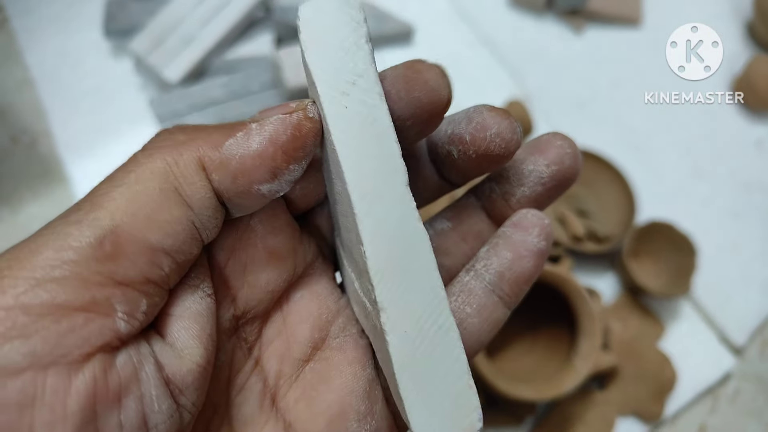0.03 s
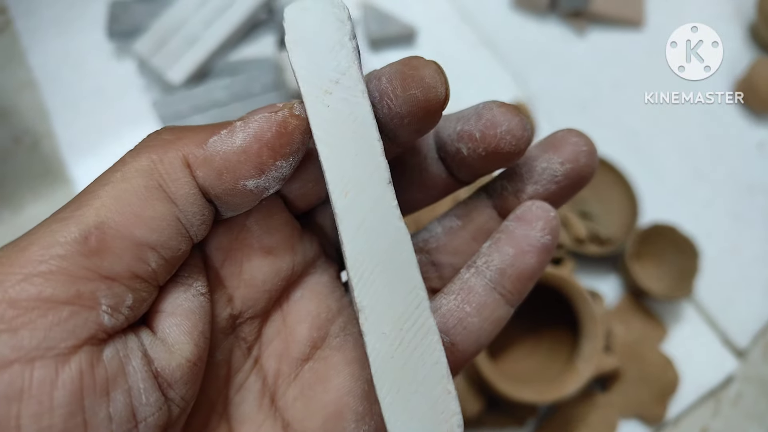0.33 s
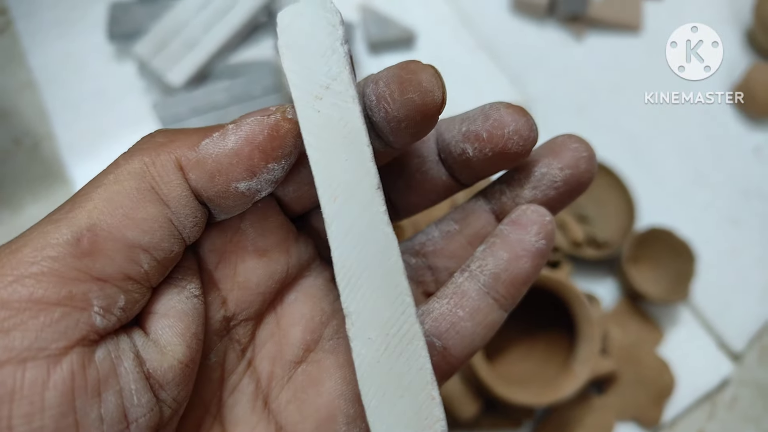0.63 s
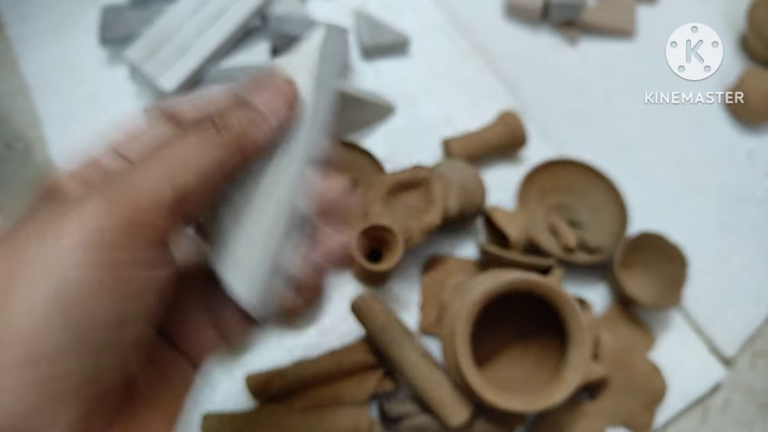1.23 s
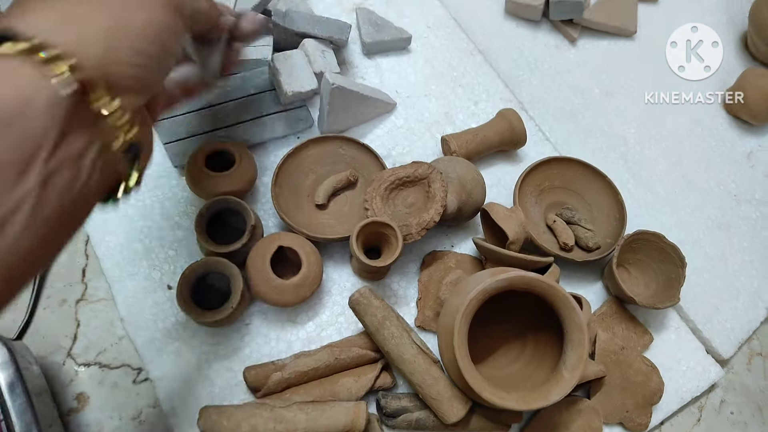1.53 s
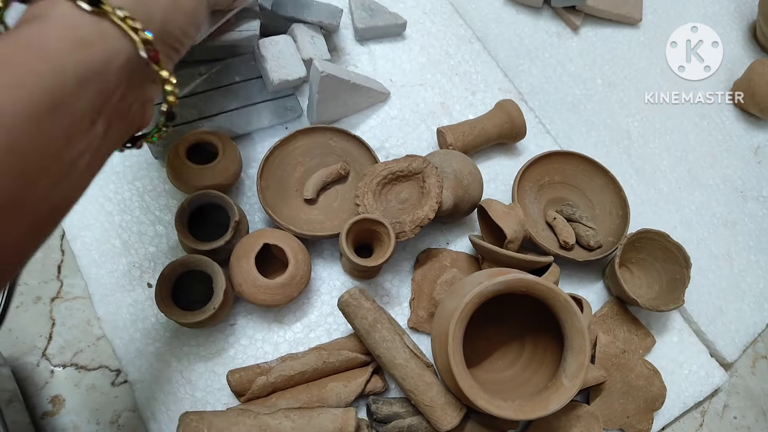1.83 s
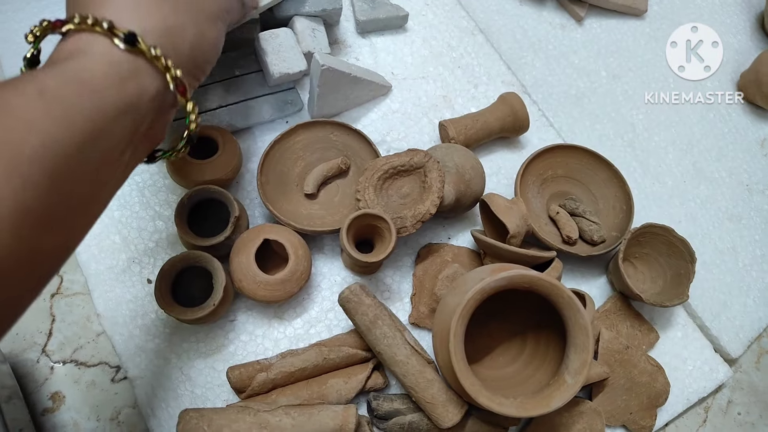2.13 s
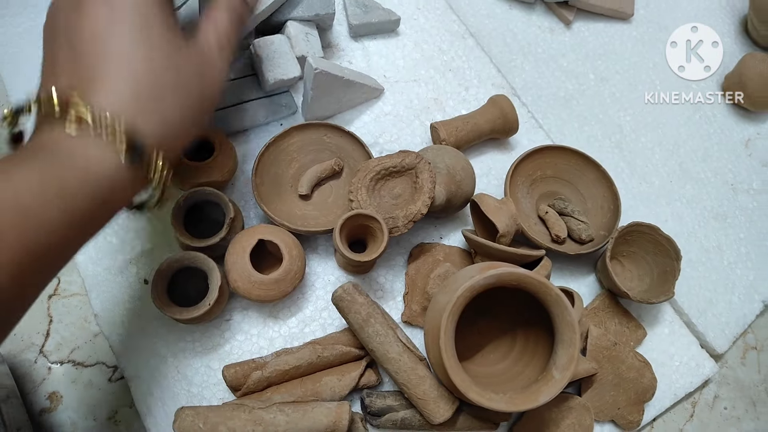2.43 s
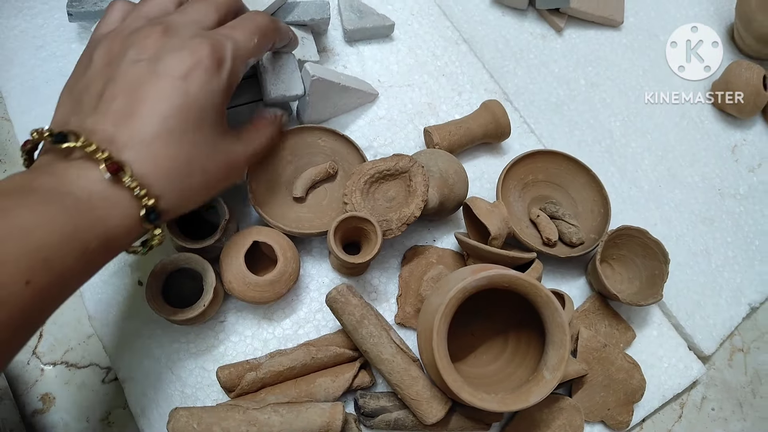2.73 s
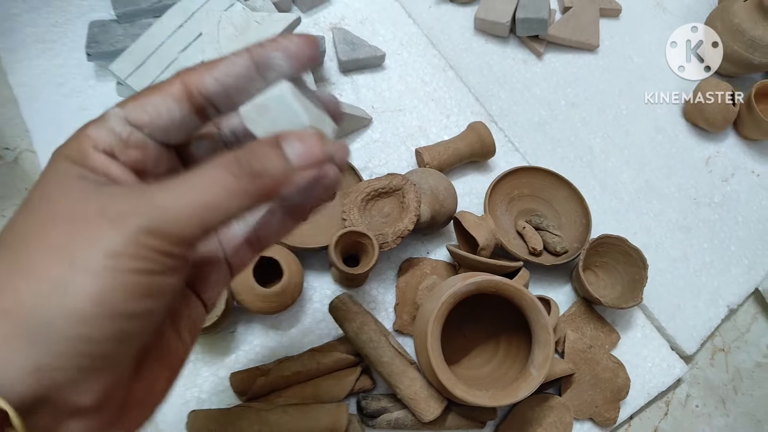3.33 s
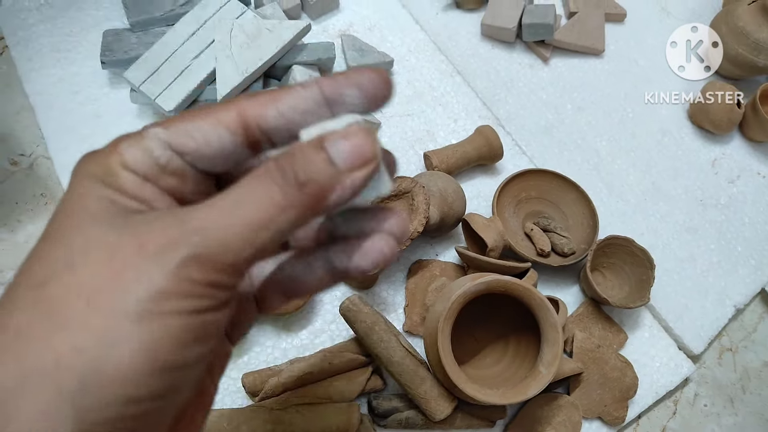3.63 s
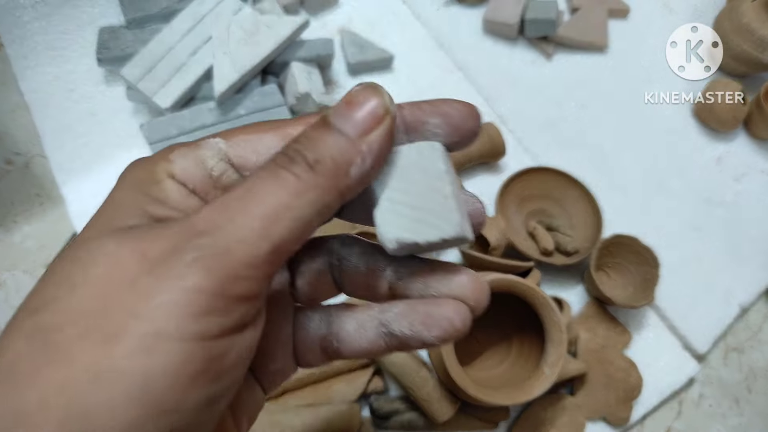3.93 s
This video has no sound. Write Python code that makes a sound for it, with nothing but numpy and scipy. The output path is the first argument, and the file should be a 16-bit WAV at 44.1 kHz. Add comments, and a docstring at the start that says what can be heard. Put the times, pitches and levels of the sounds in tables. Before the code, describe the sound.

A few small clacks of dry clay on clay, with a fan humming behind.

```python
"""Dry clay bars on a heap

In a quiet room, a hand lays a dry clay bar on a heap of others and picks out a small block.
Each contact is a dead knock of the heap, a gritty crack and sometimes the ring of one bar.
Chalky fingers rub softly and crumbs tick. A motor, probably a fan, hums behind it all in a rush of air."""
import sys
import numpy as np
from scipy import signal
from scipy.fft import rfft, irfft
from scipy.io import wavfile

SR = 44100
rng = np.random.default_rng(int(sys.argv[2]) if len(sys.argv) > 2 else 0)


def store_wav(level_fs):
    """Save 16-bit WAV to argv[1]."""
    pcm = np.round(np.clip(np.atleast_2d(level_fs), -1, 1) * 32767)
    wavfile.write(sys.argv[1], SR, pcm.T.astype(np.int16))


N = 176400
T = np.arange(N) / SR
FREQ = np.fft.rfftfreq(N, 1 / SR) + 1e-3


def amp(db):
    """Decibels to gain."""
    return 10 ** (np.asarray(db) / 20)


def unit(x):
    """Scale to rms 1."""
    return x / np.sqrt(np.mean(x ** 2))


def curve(points):
    """Join (Hz, value) points on a log-frequency axis."""
    hz, value = np.array(points, float).T
    return np.interp(np.log(FREQ), np.log(hz), value)


def noise(colour):
    """Noise of rms 1, shaped by a gain per frequency."""
    return unit(irfft(rfft(rng.standard_normal(N)) * colour, N))


def decay(t60):
    """Exponential envelope, 60 dB down after t60 seconds."""
    return np.exp(-np.minimum(np.log(1000) * T / t60, 60))


def bell(hz, octaves):
    """Bell-shaped EQ around a centre."""
    return np.exp(-.5 * (np.log2(FREQ / hz) / octaves) ** 2)


def drift(rate_hz):
    """Smooth random modulation of rms 1."""
    return noise(np.exp(-np.minimum((FREQ / rate_hz) ** 2, 20)))


def pan(db):
    """Left and right gains; positive dB leans left."""
    return amp(np.array([[1], [-1]]) * db / 2)


def butter(x, hz, kind, order):
    """Low-pass or high-pass filter."""
    return signal.sosfilt(signal.butter(order, hz, kind, fs=SR, output="sos"), x)


def add(out, start, sound):
    """Mix a sound in at a start in seconds."""
    i = int(start * SR)
    out[i:i + len(sound)] += sound[:N - i]


# The motor's tones. Each row: pitch in Hz, level in dB.
MOTOR_TONES = [(39.5, -58), (57.2, -49), (82.3, -41), (137.1, -51), (172, -51.5), (184, -49.5), (229, -55)]


def motor_hum(waver_db=0.64, wander_rad=0.25):
    """Low motor tones waver in level and phase; the higher ones wander further in phase."""
    tones = np.zeros(N)
    for hz, db in MOTOR_TONES:
        peak = np.sqrt(2) * amp(db + waver_db * drift(4.2))
        phase = 2 * np.pi * (hz * T + rng.random())
        wander = wander_rad * (hz / MOTOR_TONES[1][0]) ** 2 * drift(3.8)
        tones += peak * np.sin(phase + wander)
    return tones


# The colour of the air bed. Each row: frequency in Hz, relative level in dB.
AIR_EQ = [(20, -20.5), (40, -3.5), (80, 0), (120, 2), (185, -3), (260, -6.5), (330, -7.5), (450, -9.5),
          (600, -17.5), (660, -12), (730, -14), (850, -17.5), (1100, -18), (1700, -26), (2600, -28),
          (3600, -33.5), (5000, -43.5), (8000, -49.5), (12000, -54.5), (15500, -49)]


def air_rush(level_db=-41.5, mic_gap_m=0.14, sound_m_s=343):
    """Steady air from all sides: two mics hear long waves alike and short ones differently."""
    likeness = 0.85 * np.sinc(2 * FREQ * mic_gap_m / sound_m_s)
    mid, side = rfft(rng.standard_normal((2, N))) * np.sqrt([1 + likeness, 1 - likeness])
    spectra = np.array([mid + side, mid - side]) * amp(curve(AIR_EQ))
    return amp(level_db) * unit(irfft(spectra, N))


# Finger strokes. Each row: peak time in seconds, fade on each side in seconds, level in dB, centre in Hz.
FINGER_STROKES = [(0.044, 0.21, -69, 9900), (.9, 0.33, -73, 5130), (0.962, 0.14, -71.5, 8600),
                  (1.082, 0.033, -66, 3020), (1.296, 0.22, -72, 11000), (1.345, 0.045, -65.5, 8450),
                  (1.49, 0.057, -67, 8500), (1.713, 0.43, -75.5, 10300), (2.18, 0.039, -67, 7500),
                  (2.233, 0.023, -69, 8000), (2.434, 0.035, -67.5, 12000), (2.557, 0.13, -72.5, 9750),
                  (2.729, 0.12, -62, 1900), (2.733, 0.099, -69.5, 8950), (2.864, 0.07, -70, 9000),
                  (3.06, 0.15, -76.5, 7950), (3.315, 0.087, -78, 10900), (3.753, 0.027, -70, 8000),
                  (3.895, 0.11, -71, 10900)]


def finger_rubs(grain_db=3):
    """Dusty skin slides over clay in soft, grainy swells."""
    out = np.zeros(N)
    for peak_s, fade_s, db, hz in FINGER_STROKES:
        swell = np.cos(np.pi / 2 * np.clip((T - peak_s) / fade_s, -1, 1)) ** 2
        out += amp(db) * swell * noise(bell(hz, octaves=0.85))
    grain = unit(amp(grain_db * drift(250)))
    return out * grain


def ring(modes, size, scatter=0.006):
    """Modes die away after a blow; where it lands shifts their level and pitch a little."""
    out = np.zeros(size)
    for hz, db, t60 in modes:
        nudge_db, detune = rng.standard_normal(2)
        tone = np.sin(2 * np.pi * hz * (1 + scatter * detune) * T[:size])
        out += amp(db + nudge_db) * decay(t60)[:size] * tone
    return out


# Modes of the heap and of one free bar. Each row: pitch in Hz, level in dB, 60 dB decay in seconds.
HEAP_MODES = [(675, -2.5, 0.039), (769, -5.5, 0.03), (846, -7, 0.035), (1020, -8.5, 0.035),
              (1390, -12, 0.015), (1710, -11, 0.015), (2420, -12.5, 0.0072), (2645, -5, 0.011),
              (3200, -6, 0.0094), (3430, -16.5, 0.046), (4120, -25, 0.04), (5140, -24, 0.013),
              (6250, -21, 0.013), (7700, -21, .016)]
BAR_MODES = [(3860, -2, 0.013), (7470, -5, 0.012)]
# The colour of crushed grit. Each row: frequency in Hz, relative level in dB.
GRIT_EQ = [(300, -4), (900, 7.5), (3000, -7), (5500, -3), (11000, -9.5), (16000, -13)]
# Clay hitting clay. Each row: start in seconds, relative level in dB, hardness as a low-pass in Hz,
# grit trim in dB, bar ring trim in dB.
CONTACTS = [(2.1342, -27, 5900, 9, -20), (2.1400, -32, 7500, 14, -23), (2.1586, -9, 4430, 1, -16),
            (2.1603, -35, 15500, 16, -20), (2.1760, -26.5, 12000, 10, -20), (2.1812, -28, 13000, 5, -18),
            (2.1895, -17, 1600, -15, -25), (2.2166, -38, 15500, 32, 4), (2.2262, -44, 14000, 16, -20),
            (2.3888, -0.5, 2520, 9, -23), (2.3905, -18, 7500, 16.5, -5), (2.3936, -15, 8100, 14.5, -15),
            (2.4027, 1, 3800, -24, -10), (2.5078, -6.5, 2050, -6, 11), (2.5228, -31, 3000, -18, 9)]


def clay_clacks(level_db=-25.5, grit_db=-2, grit_t60_s=0.0058, low_cut_hz=676):
    """Each contact knocks the heap, crushes grit and rings the bar; soft contacts are duller."""
    out, size = np.zeros(N), 8000  # samples per hit
    grit = noise(amp(curve(GRIT_EQ)))
    for k, (start, db, hardness_hz, grit_trim, bar_trim) in enumerate(CONTACTS):
        knock = ring(HEAP_MODES, size)
        crack = amp(grit_db + grit_trim) * grit[k * size:(k + 1) * size] * decay(grit_t60_s)[:size]
        bar = amp(bar_trim) * ring(BAR_MODES, size)
        hit = butter(knock + crack + bar, hardness_hz, "low", order=2)
        add(out, start, amp(level_db + db) * hit)
    return butter(out, low_cut_hz, "high", order=5)  # small pieces radiate little bass


# Light ticks. Each row: start in seconds, relative level in dB, centre in Hz.
CRUMB_TICKS = [(2.6573, -20.5, 7100), (3.0348, -24, 6250), (3.2, -21.5, 13000), (3.386, -27, 11100),
               (3.745, -26.5, 6460)]


def crumb_ticks(level_db=-29, t60_s=0.0054):
    """Crumbs and edges give tiny bright snaps as the block is picked out and turned."""
    out = np.zeros(N)
    for start, db, hz in CRUMB_TICKS:
        add(out, start, amp(level_db + db) * noise(bell(hz, octaves=0.62)) * decay(t60_s))
    return out


# The stereo lean of the direct sound. Each row: frequency in Hz, left minus right in dB.
DIRECT_PAN = [(300, 9), (900, -7), (1600, 7), (2400, 6), (3700, 9), (5500, 4), (8000, 3), (15000, 3)]
# The colour of the reverb. Each row: frequency in Hz, relative level in dB.
REVERB_EQ = [(200, -16), (700, -5), (1200, -0.5), (2500, -2.5), (3900, 2), (5500, -1.5), (8000, -2),
             (16000, -6.5)]


def room(x, wet_db, right_lag_s=0.0003045, near_db=-4, walls_db=-6.5):
    """Sound arrives from the left; pots and floor scatter it at once, the walls a little later."""
    lag = np.exp(-2j * np.pi * FREQ * np.array([[0], [right_lag_s]]))
    direct = irfft(rfft(x) * lag * pan(curve(DIRECT_PAN)), N)
    colour, wet = amp(curve(REVERB_EQ)), []
    for _ in range(2):
        near = noise(colour) * decay(t60=0.012) * (T > 0.001)
        walls = noise(colour) * decay(t60=0.28) * (T > 0.0019)
        echoes = (amp(near_db) * unit(near) + amp(walls_db) * unit(walls)) / np.sqrt(N)
        wet.append(signal.fftconvolve(x, echoes)[:N])
    return direct + amp(wet_db) * np.array(wet)


def scene():
    """Close clay and fingers in the room, over a bed of hum and air."""
    clacks = room(clay_clacks(), wet_db=1)
    rubs = room(finger_rubs(), wet_db=2)
    ticks = room(crumb_ticks(), wet_db=2) * pan(db=3)
    return clacks + rubs + ticks + motor_hum() + air_rush()


# The balance of the two mic ports. Each row: frequency in Hz, left minus right in dB.
MIC_BALANCE = [(82, 4), (115, -3), (200, 0.5), (700, -0.6), (1290, -4.5), (2380, -5), (4400, -1),
               (8000, -0.5), (10200, 3), (12500, -0.5), (15000, -1.5)]


def record(dry, top_hz=16000):
    """Each of a phone's two mic ports adds its own colour; a steep low-pass trims the top."""
    coloured = irfft(rfft(dry) * pan(curve(MIC_BALANCE)), N)
    return signal.sosfilt(signal.ellip(8, .2, 70, top_hz, fs=SR, output="sos"), coloured)


dry = scene()
out = record(dry)
store_wav(out)
```